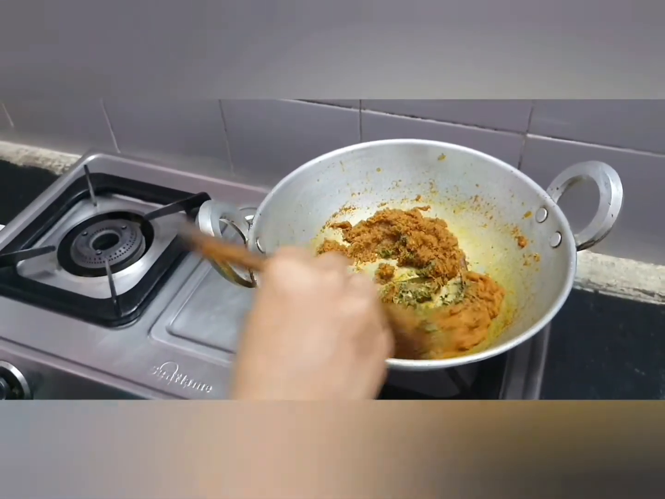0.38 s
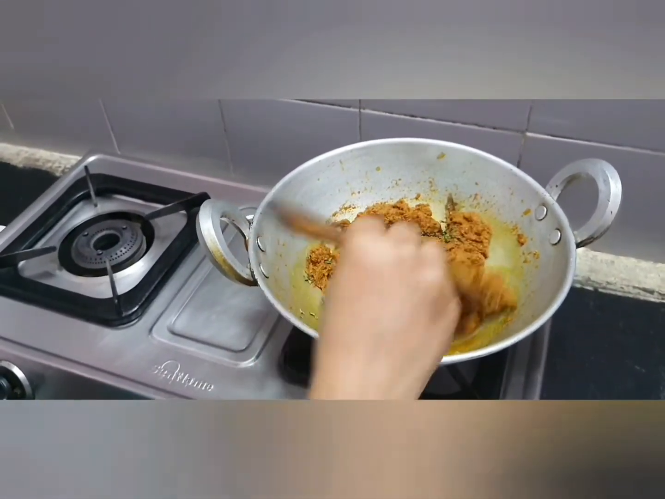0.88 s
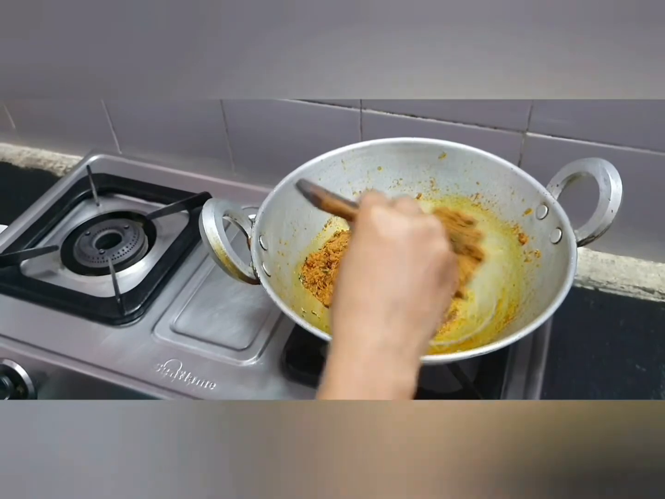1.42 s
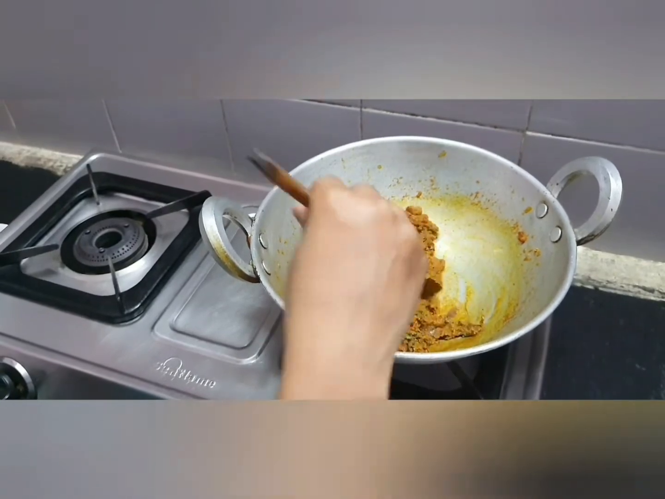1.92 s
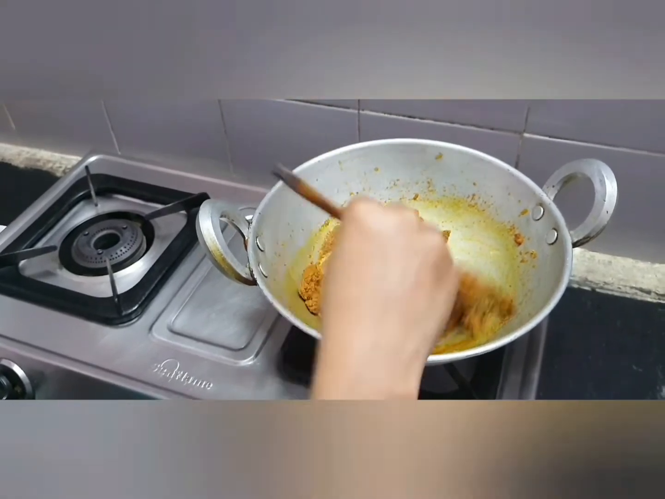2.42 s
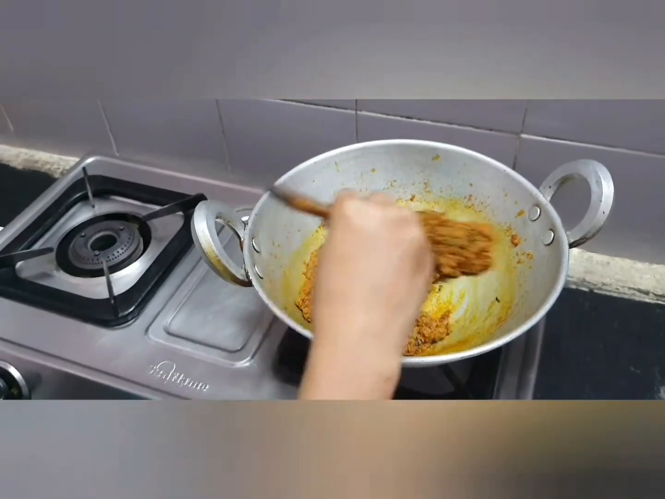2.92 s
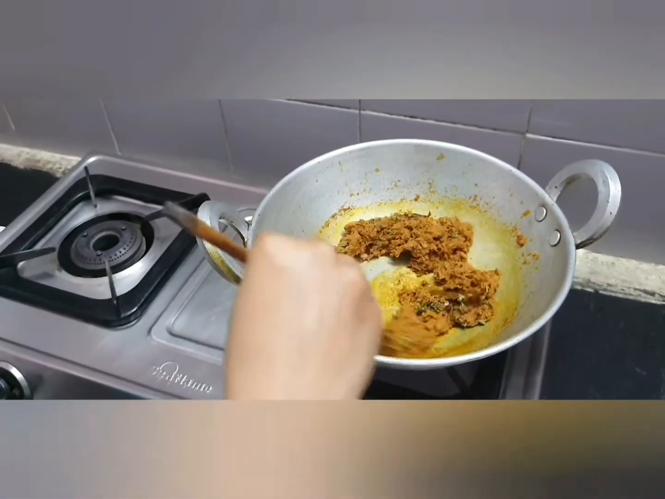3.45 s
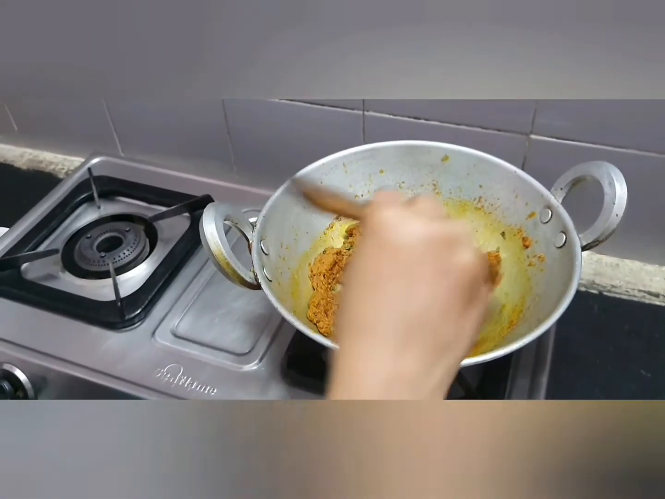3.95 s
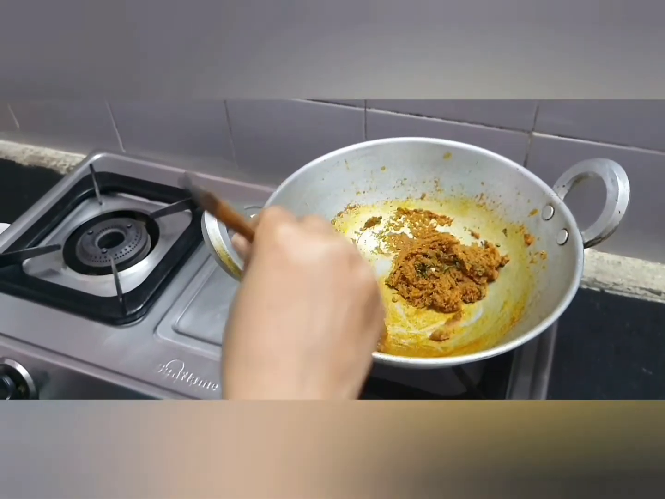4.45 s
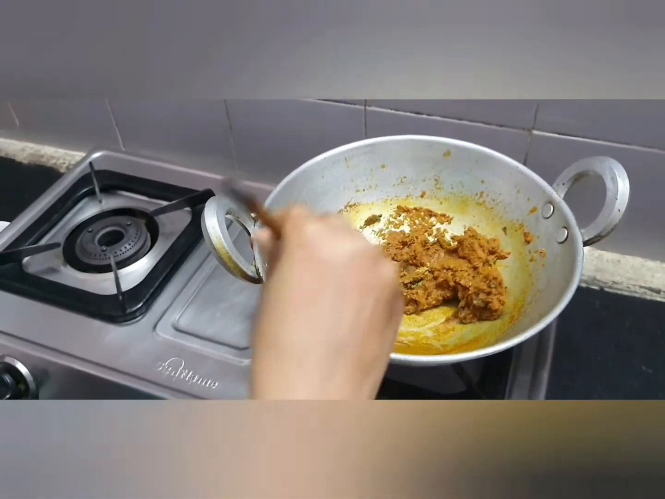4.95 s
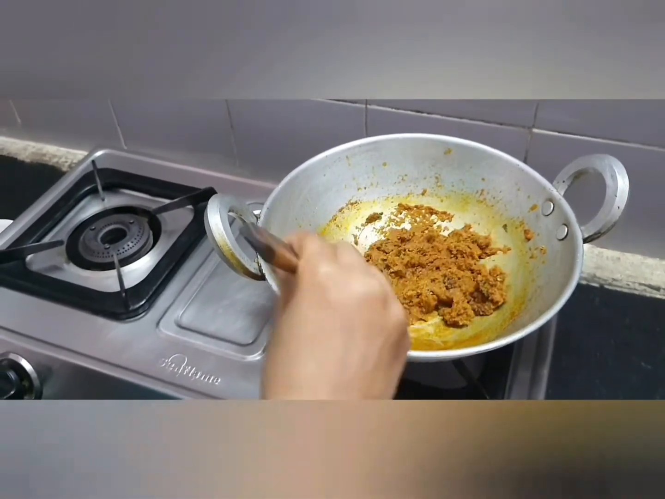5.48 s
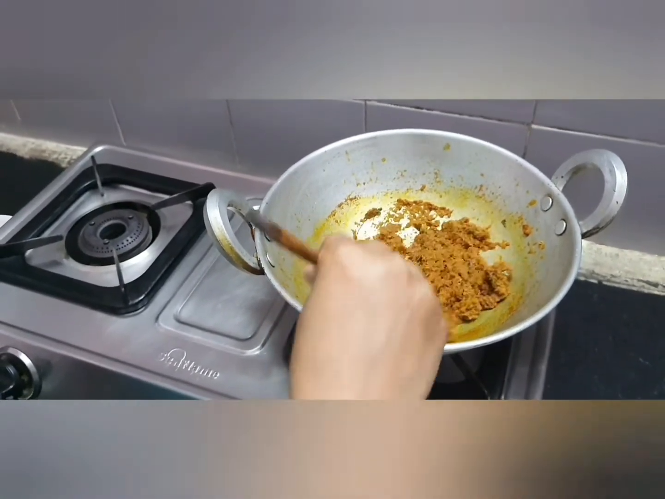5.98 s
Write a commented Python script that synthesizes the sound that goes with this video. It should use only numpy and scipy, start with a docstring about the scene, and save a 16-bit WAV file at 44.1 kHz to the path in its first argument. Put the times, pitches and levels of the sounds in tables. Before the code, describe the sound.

Thick paste fries with fluctuating fizz and fine spits while somebody stirs it briskly. Soft rubbing drags alternate with abrupt wooden clunks and scrapes that ring a metal pan briefly, mid-pitched and dull. Low stove thuds follow the pushes, with two short buzzing skids. A phone held close catches everything in stereo, with very short tiled-room reflections and a quiet low rumble.

```python
"""A small kitchen, a phone held close to a thin metal pan: a wooden spatula already drags through thick paste.
Its stick-slip chatter rings the damped pan, over sizzling oil with spits and a low rumble of flame and room.
The stove top drones as the pan is pushed. From 0.2 s on come knocks with thump and tick, some repeated about
30 ms later, and the blade bites into the metal in abrupt scrapes. Near 2.2 s and 4.8 s the pan skids and buzzes.
All ring is rung out of modelled resonances; the sizzle is filtered grit, and short tiled-room echoes follow the pan."""
import sys
import numpy as np
from scipy import signal
from scipy.fft import rfft, irfft, next_fast_len
from scipy.io import wavfile
from scipy.ndimage import uniform_filter1d, map_coordinates

SR = 44100
rng = np.random.default_rng(int(sys.argv[2]) if len(sys.argv) > 2 else 0)


def dump_mix(stems):
    """Bounce the given channels to the path in sys.argv[1] as a 16-bit WAV at rate SR."""
    frames = np.atleast_2d(stems).T  # one column per channel
    limited = np.clip(frames, -1, 1)  # hard clip at full scale
    pcm = np.round(limited * 32767).astype(np.int16)
    wavfile.write(sys.argv[1], SR, pcm)


def level_to_linear(level):
    """Convert decibel levels to linear amplitude factors, elementwise."""
    exponent = np.asarray(level, float) / 20
    return 10 ** exponent


N = 269451

# Resonances of the pan, six of the whole bowl, five of the lower wall, the rest of the upper wall:
# (frequency [Hz], width [Hz], relative level [dB])
PAN_MODES = [(202, 40, -25.5), (276, 10.6, -13), (311.3, 16.7, -17), (355, 6.4, -6.5), (407.7, 9.5, 1.5),
             (482.4, 14.7, -11.5), (540, 25, -13), (579, 9, -8), (633.4, 16.7, -11.5), (678, 16, -15.5),
             (750.6, 28, -13.5), (796.6, 25, -16.5), (863, 40, -13), (902.5, 38, -13), (985, 36, -13.5),
             (1073.4, 22.4, -17), (1126, 66, -20), (1224, 23, -15.5), (1272, 54, -19.5), (1345, 123, -21)]
# Upper ring of the metal under the blade's edge: (frequency [Hz], width [Hz], relative level [dB])
RASP_MODES = [(1486, 220, 2), (2131, 84, 3.5), (2100, 59, 0), (2490, 38, 6.5), (2903, 27, -2),
              (2300, 1040, 8), (4870, 1600, -11)]
# The frying: (time [s], fine fizz before its trim [dB], coarse bubbling before its trim [dB])
FRYING = [(0.0, -48, -46.5), (0.34, -48.5, -50.5), (0.36, -51, -52.5), (0.71, -47, -48),
          (1.0, -52.5, -56.5), (1.05, -49.5, -50), (1.07, -49, -47), (1.29, -48, -50), (1.43, -49.5, -53.5),
          (1.75, -47.5, -47.5), (2.09, -55.5, -57), (2.19, -52, -53.5), (3.11, -51, -55),
          (3.22, -49.5, -50.5), (3.4, -48, -51), (3.47, -53.5, -53), (3.54, -49.5, -43), (3.64, -55, -63),
          (3.73, -48.5, -52.5), (3.79, -48.5, -48.5), (3.91, -56, -62), (4.22, -51, -55), (4.41, -60, -65),
          (4.59, -51, -53), (4.68, -54, -56.5), (5.0, -52, -54.5), (5.04, -51, -47), (5.19, -53, -61.5),
          (5.56, -53, -54.5), (5.72, -57, -65.5), (5.92, -51.5, -58), (6.11, -52.5, -53.5)]
LEFT_RIGHT = np.array([[1], [-1]])


def unit(x):
    """Scaled to rms 1."""
    return x / np.sqrt(np.mean(x ** 2) + 1e-20)


def along(points, hz):
    """Reads (Hz, value) points on a log frequency axis."""
    f, v = np.transpose(points)
    return np.interp(np.log(hz + 1), np.log(f + 1), v)


def curves(rows):
    """One value per sample for each column after the time."""
    s, *cols = np.transpose(rows)
    return [np.interp(np.arange(N) / SR, s, c) for c in cols]


def wobble(rate):
    """A smooth random curve, rate knots a second (200 at most)."""
    knots = rng.standard_normal(int(N * 200 / SR) + 4)
    return map_coordinates(knots, [np.arange(N) * min(rate, 200) / SR])


def level_db(power):
    """Power as dB."""
    return 10 * np.log10(power)


def swell(s, half):
    """A smooth bump of power, a quarter of its top half a length from the middle."""
    return 4.0 ** -(((np.arange(N) / SR - s) / half) ** 2)


def filtered(x, response):
    """x times a complex response of frequency."""
    m = next_fast_len(N + SR // 2)
    return irfft(rfft(x, m) * response(np.fft.rfftfreq(m, 1 / SR)), m)[..., :N]


def modes(table):
    """Causal response of a set of resonances, alternating in sign."""
    def response(f):
        total = 0
        for k, (centre, width, db) in enumerate(table):
            damping = 1j * f * width
            total = total + (-1) ** k * level_to_linear(db) * damping / (centre * centre - f * f + damping)
        return total
    return response


def grit(spread_db, patchy_db):
    """Two unrelated streams of tiny impulses of uneven size, with patches of random gain over time and frequency."""
    impulses = rng.standard_normal((2, N)) * level_to_linear(spread_db * rng.standard_normal(N))
    z = signal.stft(impulses, nperseg=512)[2]
    field = uniform_filter1d(rng.standard_normal(z.shape[1:]), size=4, axis=0)
    field = uniform_filter1d(field, size=8, axis=1)
    return unit(signal.istft(z * level_to_linear(patchy_db * unit(field)), nperseg=512)[1][:, :N])


def spread(pair, alike, side):
    """Two unrelated streams mixed to a left-right likeness and balance."""
    def mixing(hz):
        turn = np.arccos(np.clip(along(alike, hz), -1, 1)) / 2
        return np.array([np.cos(turn), np.sin(turn)])
    mid, edge = filtered(pair, mixing)
    return filtered(np.array([mid + edge, mid - edge]), lambda hz: level_to_linear(along(side, hz) / 2 * LEFT_RIGHT))


def rung(table, db, force):
    """A force shaped by a level curve rings a set of resonances; the unshaped force sets the scale."""
    shaped, plain = filtered(np.array([force * level_to_linear(db), force]), modes(table))
    return shaped / np.std(plain)


def strokes():
    """Drive levels of bowl, walls and rasp: bites start at once, hold and fall; drags swell; powers add."""
    # The blade bites into the metal:
    # (time [s], bowl [dB], lower wall [dB], upper wall [dB], rasp before its trim [dB])
    bites = [(0.222, -36.5, -45.5, -42, -48), (0.591, -34.5, -46, -40.5, -48.5),
             (1.681, -39.5, -46, -53, -61), (1.836, -42, -46.5, -46, -57.5), (2.551, -34.5, -43, -37, -46),
             (2.751, -41, -52, -59, -56), (2.934, -40.5, -45, -45.5, -52.5), (3.179, -42, -52, -50, -47),
             (3.324, -40, -43.5, -42.5, -50), (3.483, -39.5, -46, -49, -53),
             (3.683, -40.5, -45, -42.5, -49), (4.05, -35.5, -45.5, -54, -60), (4.511, -33, -34, -38.5, -50),
             (4.827, -47.5, -52.5, -50.5, -56.5), (5.008, -46, -42, -54, -65),
             (5.509, -35.5, -35.5, -45.5, -44), (5.813, -54, -55.5, -53.5, -63.5),
             (6.021, -53, -51, -57, -65)]
    # Fall after the hold: (bowl, lower wall, upper wall, rasp) [dB/s]
    bite_fall = [260, 226, 257, 175]
    bite_hold_s = 0.024
    # The blade drags through the paste, swelling and fading:
    # (middle [s], half length [s], bowl [dB], lower wall [dB], rasp before its trim [dB])
    drags = [(0.02, 0.038, -42, -57, -54), (0.063, 0.044, -48.5, -54, -64), (0.35, 0.12, -51.5, -62, -62),
             (0.485, 0.064, -52, -61, -63), (0.7, .05, -50, -59, -52.5), (0.822, 0.078, -49, -52, -55.5),
             (0.928, 0.028, -50.5, -58, -70), (1.05, 0.04, -56.5, -61.5, -79),
             (1.239, 0.034, -49, -49.5, -67), (1.302, 0.024, -46.5, -49, -74),
             (1.38, 0.066, -52, -60.5, -81), (1.14, 0.025, -64, -74, -65), (1.52, 0.029, -67, -67, -52.5),
             (1.645, 0.022, -50, -55.5, -55), (1.757, 0.059, -47, -51.5, -52),
             (1.932, 0.067, -60.5, -67, -75), (2.179, 0.036, -50.5, -60.5, -56.5),
             (2.333, 0.018, -45, -67, -69), (2.392, 0.026, -52, -47.5, -65),
             (2.433, 0.057, -43.5, -46.5, -54), (2.685, 0.099, -51, -59.5, -59.5),
             (2.813, 0.02, -42.5, -46.5, -52.5), (2.858, 0.039, -45.5, -48, -58),
             (3.032, 0.043, -55, -60, -57), (3.157, 0.021, -44.5, -48.5, -53),
             (3.232, 0.018, -43, -50, -54), (3.543, 0.06, -45, -46, -53.5), (3.786, 0.07, -50, -56.5, -47),
             (3.83, .025, -51.5, -65, -61), (4.13, .03, -54, -63, -59), (4.23, 0.027, -46, -50.5, -55),
             (4.603, 0.049, -48, -56, -64), (4.924, 0.024, -61, -66, -71), (5.061, 0.036, -42, -50.5, -51),
             (5.334, 0.025, -51.5, -62, -55.5), (5.584, 0.024, -44.5, -57, -64),
             (6.005, 0.014, -59, -57, -68), (6.06, 0.027, -50, -51, -61)]
    drag_upper_db = -1  # upper wall over lower wall
    # The frying itself shakes the pan: (bowl, lower wall, upper wall, rasp before its trim)
    # [dB over the bubbling column of FRYING]
    resting = [-21, -34, -20, -8.5]
    t = np.arange(N) / SR
    bubbling_db = curves(FRYING)[1]
    power = level_to_linear(np.add.outer(resting, bubbling_db)) ** 2
    for s, *db in bites:
        fall = np.outer(bite_fall, np.maximum(t - s - bite_hold_s, 0))
        power = power + (t >= s) * level_to_linear(np.array(db)[:, None] - fall) ** 2
    for s, half, bowl_db, wall_db, rasp_db in drags:
        top_db = [[bowl_db], [wall_db], [wall_db + drag_upper_db], [rasp_db]]
        power = power + level_to_linear(top_db) ** 2 * swell(s, half)
    return level_db(power)


def spatula():
    """Stick-slip chatter of the blade drives the pan."""
    # Likeness of the pan at the two microphones: (frequency [Hz], correlation)
    pan_alike = [(150, 0.87), (290, 1), (420, 1), (640, 0.59), (1000, 0.18), (3000, 0.073)]
    # Balance of the pan: (frequency [Hz], left minus right [dB])
    pan_side = [(60, 10), (150, 0.5), (380, -1), (950, 2), (2380, -1.5), (5980, -4), (15000, 23)]

    def force(patchy_db):
        return spread(grit(spread_db=3.5, patchy_db=patchy_db), pan_alike, pan_side)

    bowl_db, lower_db, upper_db, rasp_db = strokes()
    chatter_db = 1.05 * wobble(40)  # the blade judders
    wall_force = force(patchy_db=2.0)  # both parts of the wall share it
    rub = rung(PAN_MODES[:6], bowl_db + chatter_db, force(patchy_db=3.0))
    rub += rung(PAN_MODES[6:11], lower_db + chatter_db, wall_force)
    rub += rung(PAN_MODES[11:], upper_db + chatter_db, wall_force)
    rasp_db = rasp_db + 2.0 + 0.99 * chatter_db
    return rub + rung(RASP_MODES, rasp_db, force(patchy_db=3.5))


def walls(x):
    """Each frequency of the tiled room's answer dies at its own speed."""
    # Decay of the room: (frequency [Hz], time to fall 60 dB [s])
    decay = [(200, 0.17), (2000, 0.17), (10000, 0.096)]
    hz, t, z = signal.stft(rng.standard_normal((2, SR // 2)), SR, nperseg=256)
    fading = level_to_linear(-60 * t / along(decay, hz)[:, None])
    tail = signal.istft(z * fading, SR, nperseg=256)[1]
    late = np.pad(x, ((0, 0), (200, 0)))  # the answer starts 200 samples behind
    return signal.fftconvolve(late, tail / np.linalg.norm(tail[0]), axes=1)[:, :N]


def sizzle():
    """Dense bursting of tiny steam bubbles; larger ones sound lower, a few droplets spit."""
    # Colour of the fine fizz: (frequency [Hz], relative level [dB])
    fizz_colour = [(900, -10), (1500, -9.5), (2100, -11.5), (3000, -7), (4000, -9.5), (5500, -8),
                   (8600, -16), (10400, -8.5), (12200, -1), (14000, -6), (15700, -6)]
    # Colour of the coarse bubbling: (frequency [Hz], relative level [dB])
    bubbling_colour = [(1500, -46), (3000, -15.5), (5400, -3.5), (6800, -7.5), (8500, -25.5)]
    # Droplets: (time [s], level before its trim [dB], pitch [Hz])
    spits = [(0.4795, -22.5, 12200), (0.829, -24, 12000), (0.8982, -24, 12100), (1.051, -19, 12200),
             (1.1144, -24, 4970), (1.3306, -21, 12800), (2.156, -34, 12200), (2.5506, -36, 12000),
             (4.5111, -31, 12100), (5.025, -29, 4930), (5.5119, -44, 3850)]
    # Balance, added to the overall lean: (frequency [Hz], left minus right [dB])
    fizz_side = [(1500, -1.5), (3000, 5.5), (5000, -4.5), (7000, 5.5), (9000, 5), (11000, -6.5),
                 (13000, -4.5), (15500, 11)]
    fizz_db, coarse_db = curves(FRYING)
    surge_db = 1.55 * wobble(25)
    fizz = unit(filtered(grit(spread_db=0.5, patchy_db=2.0), lambda hz: level_to_linear(along(fizz_colour, hz))))
    coarse = unit(filtered(grit(spread_db=3, patchy_db=3.0), lambda hz: level_to_linear(along(bubbling_colour, hz))))
    frying = level_to_linear(fizz_db + 5.0 + surge_db) * fizz + level_to_linear(coarse_db + 2.0 + surge_db) * coarse
    out = np.pad(frying, ((0, 0), (0, SR)))  # room for a late droplet
    t = np.arange(SR // 100) / SR
    bursts = rng.standard_normal((len(spits), 2, len(t)))
    for (s, db, hz), burst in zip(spits, bursts):
        envelope = level_to_linear(db - 7.0 - 60 * t / 0.013)  # falls at 60 dB in 13 ms
        out[:, round(s * SR):][:, :len(t)] += envelope * (np.sin(2 * np.pi * hz * t) + 0.4 * burst)
    # Left minus right drifts by 0.4 dB/s as the paste moves across the pan
    lean_db = -3.5 + 0.4 * np.arange(N) / SR
    return spread(out[:, :N], [(1000, 0.022)], fizz_side) * level_to_linear(lean_db / 2 * LEFT_RIGHT)


def stove():
    """The sheet-metal stove top drones low under the pushed pan and buzzes when the pan skids."""
    # Resonances of the stove top: (frequency [Hz], width [Hz], relative level [dB])
    stove_modes = [(101, 28, -5), (197, 65, -20)]
    # The pan is shoved against its stand: (middle [s], drone level [dB])
    shoves = [(0.05, -60), (0.28, -53.5), (0.7, -56), (1.07, -60), (1.24, -61), (1.53, -69), (1.88, -54),
              (2.26, -56), (2.65, -58), (3.0, -58), (3.24, -64), (3.38, -59), (3.56, -60), (3.74, -62),
              (4.1, -50), (4.63, -54), (4.86, -52), (5.08, -59), (5.6, -59.5), (6.09, -57)]
    # The pan skids on its stand: (start [s], peak [s], end [s], peak level before the channel gains [dB])
    judders = [(2.143, 2.182, 2.243, -47), (4.748, 4.778, 4.82, -49.5)]
    # Partials of the skid: (multiple of the slip rate, level [dB])
    slip_partials = [(1, 0), (2, -13), (3, -13), (4, -15)]
    shove_half_s, resting_db = 0.056, -72
    slip_hz, judder_edge_db = 100.6, -10  # slip rate; level at both ends against the peak
    push_power = level_to_linear(resting_db) ** 2
    for s, db in shoves:
        push_power = push_power + level_to_linear(db) ** 2 * swell(s, shove_half_s)
    force = spread(grit(spread_db=1.0, patchy_db=2.6), [(100, 0.72)], [(100, -3.5)])
    out = rung(stove_modes, level_db(push_power), force)
    t = np.arange(N) / SR
    for start, peak, end, peak_db in judders:
        db = peak_db + judder_edge_db * np.interp(t, [start, peak, end], [1, 0, 1])
        gain = level_to_linear(db + np.array([[1.5], [4.5]]))  # left, right [dB]
        buzz = 0
        for k, level in slip_partials:
            partial = np.sin(2 * np.pi * k * slip_hz * t)
            buzz = buzz + level_to_linear(level + 1.3 * k * wobble(30)) * partial  # higher partials flicker more
        fade = np.clip(np.minimum(t - start, end - t) / 0.0043, 0, 1)
        out = (1 - fade) * out + fade * gain * buzz  # the buzz takes the drone's place
    return out


def background():
    """Flame and room rumble: steady filtered grit."""
    # Colour of the rumble: (frequency [Hz], relative level [dB])
    rumble_colour = [(15, -34), (30, -10), (55, 2.5), (75, 0), (150, -4), (250, -7.5), (500, -14),
                     (700, -25), (1400, -19), (2200, -10), (4000, -69)]
    air = filtered(grit(spread_db=2.0, patchy_db=-1.5), lambda hz: level_to_linear(along(rumble_colour, hz)))
    rumble = unit(spread(air, [(40, 0.21), (150, 0.5), (1000, 0.05)], [(100, -4.0)]))
    return level_to_linear(-63 + 0.44 * wobble(5.5)) * rumble


def knocks():
    """Knocks, some repeated about 30 ms later: each a woody knock, a thump of the bowl and a sharp tick."""
    # Knocks and their repeats: (time [s], knock drive [dB], knock pitch [Hz],
    # tick over the knock before its trim [dB], thump over the knock before its trim [dB])
    blows = [(0.221, -28, 820, -12, -1), (0.251, -27.5, 890, -21, -3.5), (0.592, -32, 890, -23, 2.5),
             (0.624, -31.5, 560, -22, 8), (1.683, -40, 557, -14, 6), (1.836, -27, 820, -26, -4.5),
             (2.553, -21.5, 800, -12, -3.5), (2.584, -37, 980, -4, -4), (2.602, -33.5, 900, -18, -3),
             (2.938, -35, 910, -18, -7), (3.178, -32.5, 810, -9, -19), (3.328, -33, 910, -25, -0.5),
             (3.685, -36, 900, -5, 2.5), (4.05, -33.5, 500, -22, 4.5), (4.511, -23, 813, -35, -9.5),
             (4.546, -32.5, 580, -8, 3), (4.83, -40, 604, -8, -3), (5.009, -30, 786, -24, -8),
             (5.512, -25.5, 547, -6, -10), (5.537, -30.5, 540, -19, -3.5), (5.815, -47.5, 890, -13, 3),
             (6.024, -41, 795, -13, -2.5)]
    wood, ticks = np.zeros(N + SR), np.zeros((2, N + SR))
    t = np.arange(SR // 20) / SR
    cushion = 1 - np.exp(-t / 0.00086)  # paste cushions the blow
    bursts = rng.standard_normal((len(blows), 2, len(t)))
    for (s, db, hz, tick_db, thump_db), burst in zip(blows, bursts):
        start = round(s * SR)
        knock = level_to_linear(db - 60 * t / 0.026) * np.sin(2 * np.pi * hz * t)
        thump = level_to_linear(db + thump_db + 6.0 - 60 * t / 0.022) * np.sin(2 * np.pi * 370 * t)
        wood[start:][:len(t)] += (knock + thump) * cushion
        tick = burst + 0.27 * burst[::-1]  # each channel takes a little of the other
        ticks[:, start:][:, :len(t)] += level_to_linear(db + tick_db + 3.0 - 60 * t / 0.012) * tick
    # A thin pan radiates no bass
    thock = filtered(wood[:N], lambda hz: (1j * hz / (220 + 1j * hz)) ** 2)
    # The wood itself, then the pan's ring
    ring = level_to_linear(0.5) * thock + level_to_linear(11.0) * filtered(thock, modes(PAN_MODES))
    return ring * level_to_linear([[0.6], [-0.6]]) + filtered(ticks[:, :N], modes(RASP_MODES))


def scene():
    """Everything at the microphones."""
    pan = spatula() + knocks()
    return pan + level_to_linear(-8.5) * walls(pan) + sizzle() + stove() + background()


def roll_off(x):
    """The treble ends steeply here."""
    return signal.sosfilt(signal.butter(12, 17090, fs=SR, output="sos"), x)


def record(dry):
    """The phone keeps nothing from its band limit of 15870 Hz up."""
    mix = filtered(dry, lambda hz: hz < 15870)
    return roll_off(mix)


dry = scene()
out = record(dry)
dump_mix(out)
```